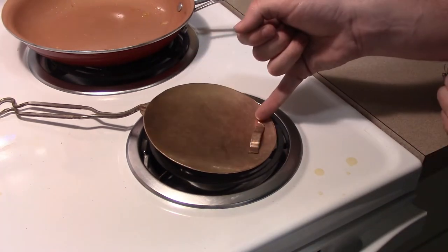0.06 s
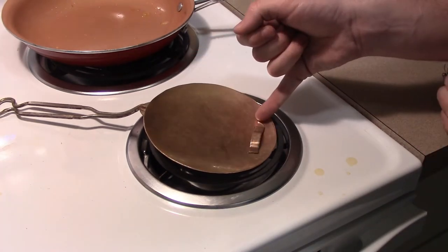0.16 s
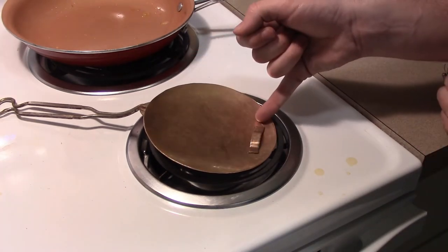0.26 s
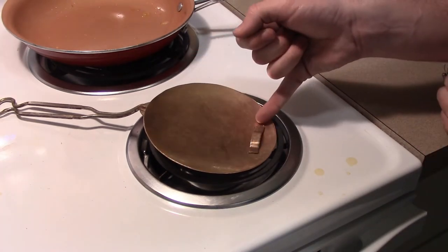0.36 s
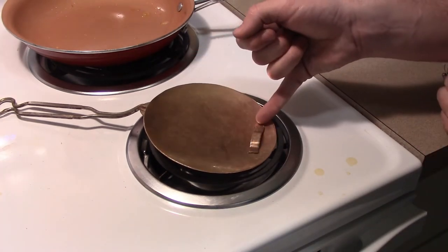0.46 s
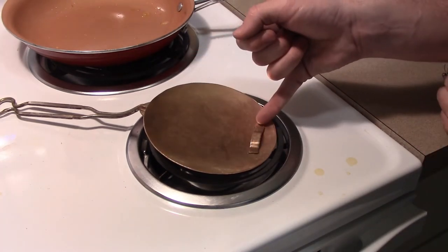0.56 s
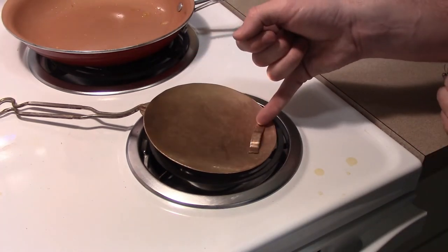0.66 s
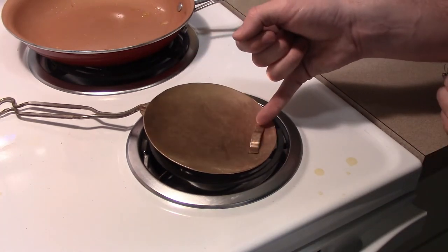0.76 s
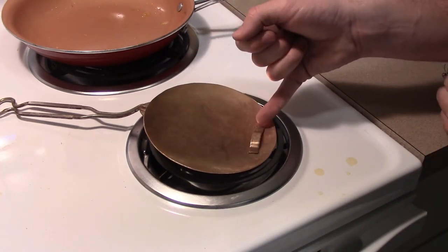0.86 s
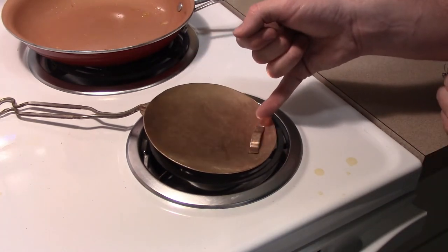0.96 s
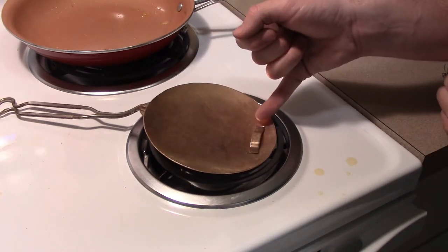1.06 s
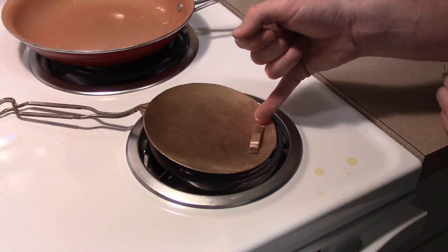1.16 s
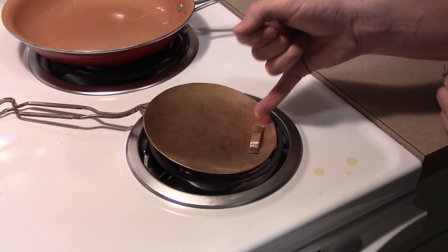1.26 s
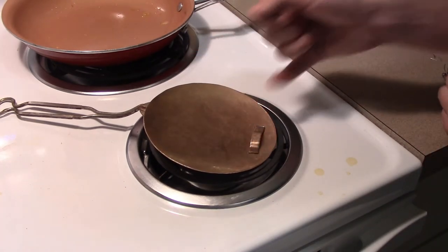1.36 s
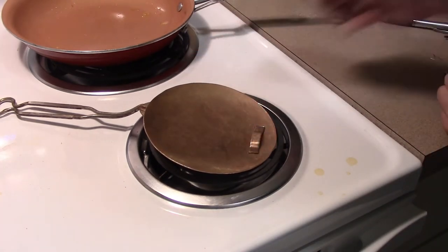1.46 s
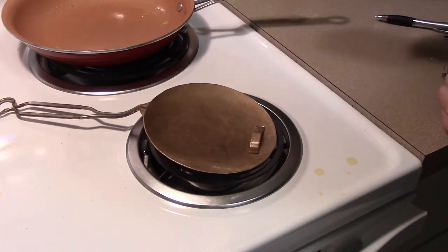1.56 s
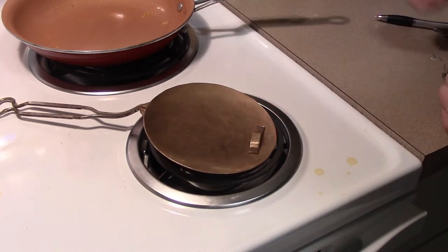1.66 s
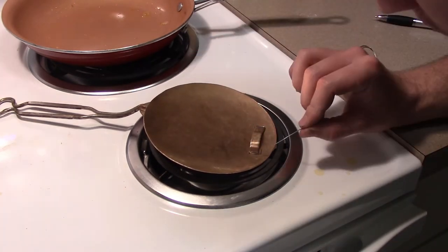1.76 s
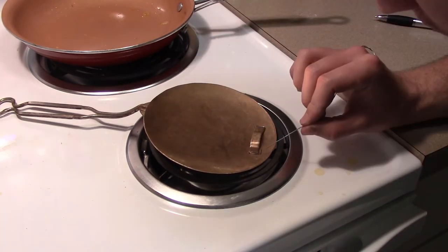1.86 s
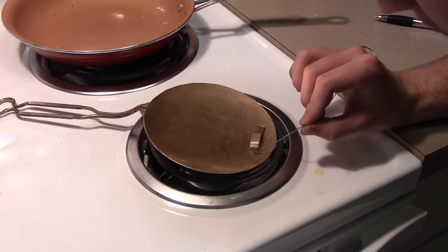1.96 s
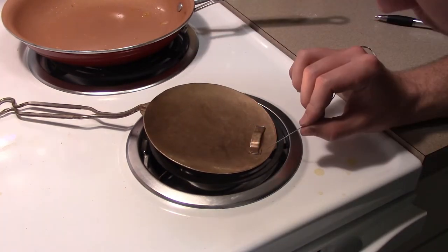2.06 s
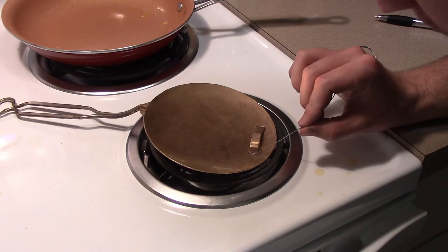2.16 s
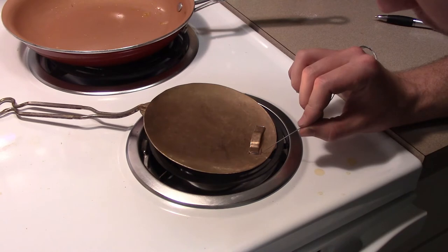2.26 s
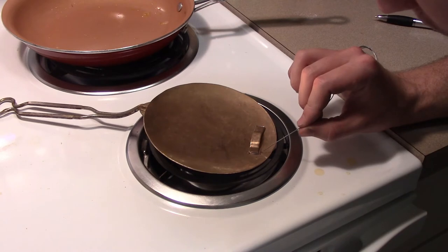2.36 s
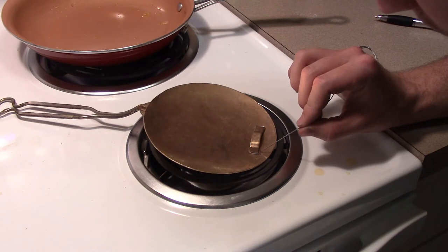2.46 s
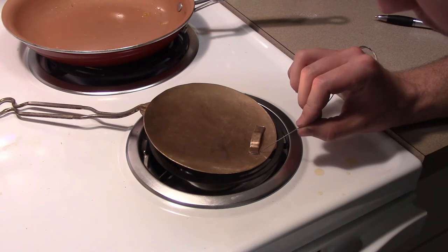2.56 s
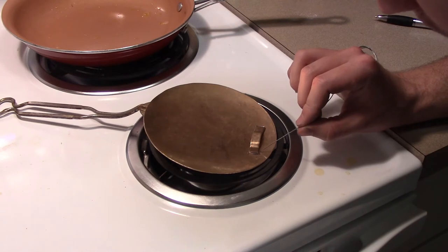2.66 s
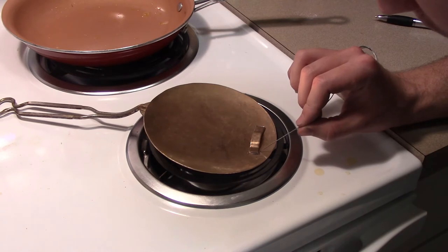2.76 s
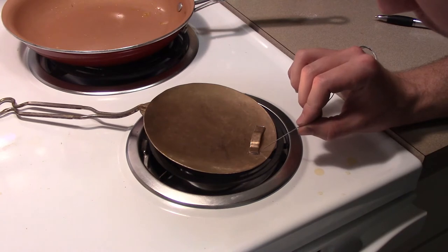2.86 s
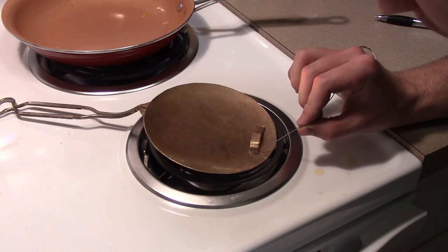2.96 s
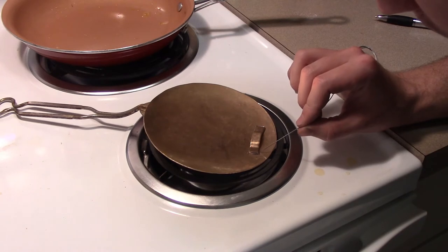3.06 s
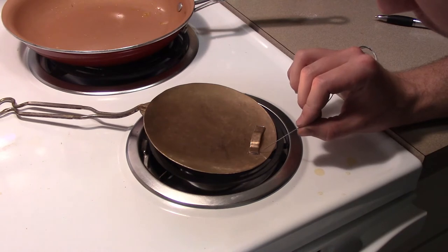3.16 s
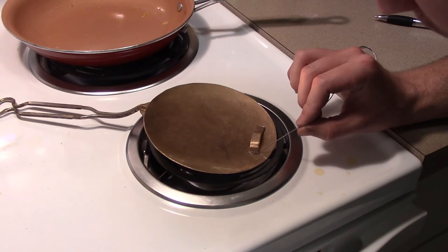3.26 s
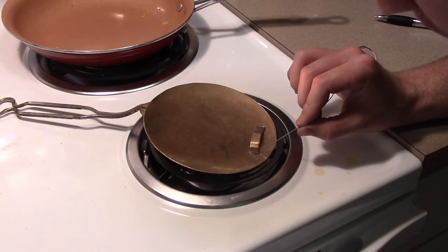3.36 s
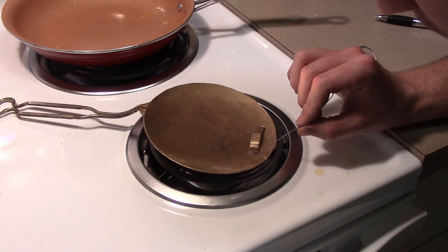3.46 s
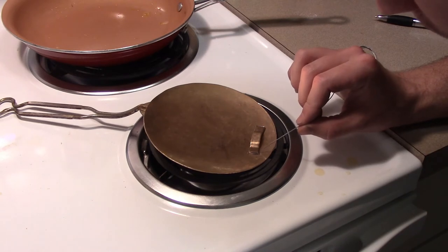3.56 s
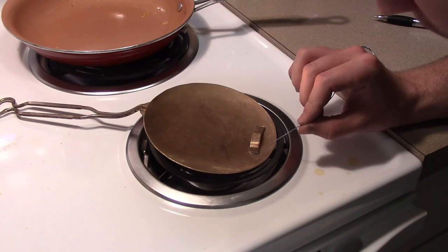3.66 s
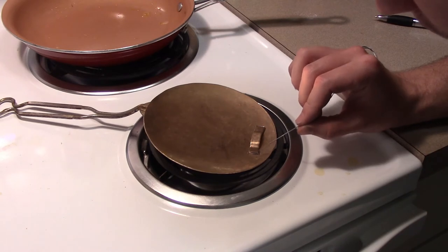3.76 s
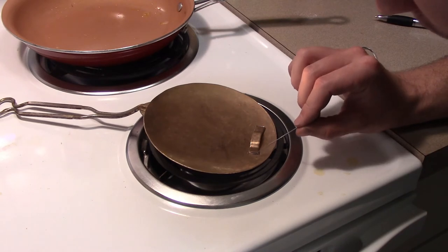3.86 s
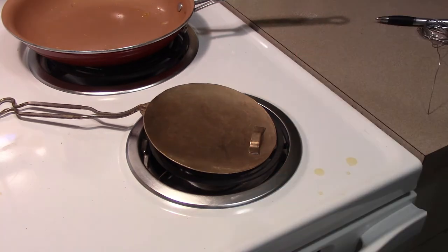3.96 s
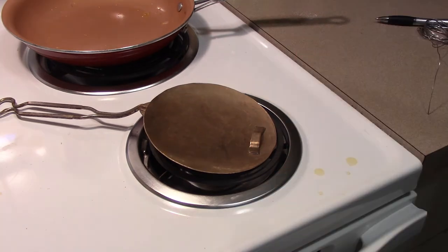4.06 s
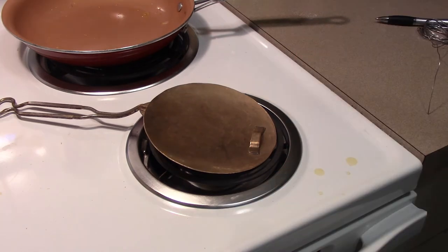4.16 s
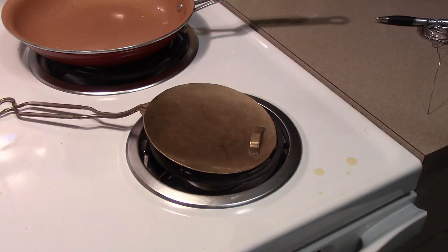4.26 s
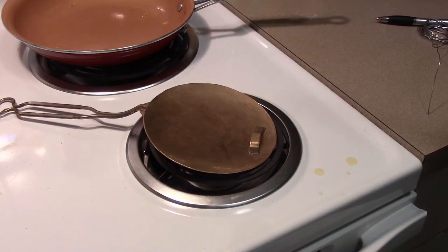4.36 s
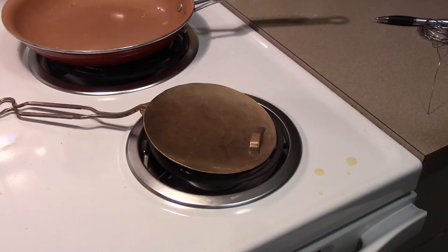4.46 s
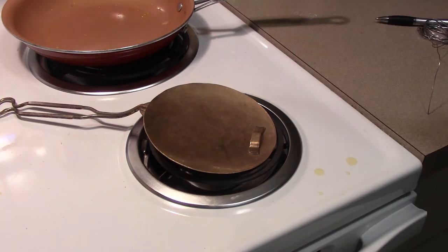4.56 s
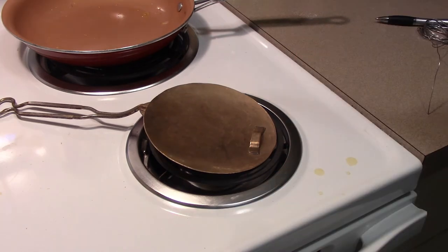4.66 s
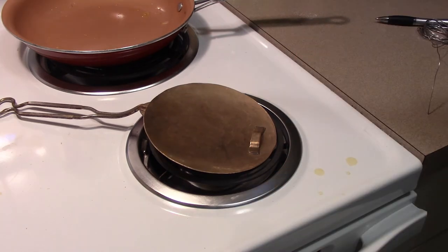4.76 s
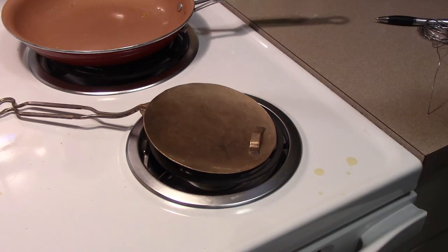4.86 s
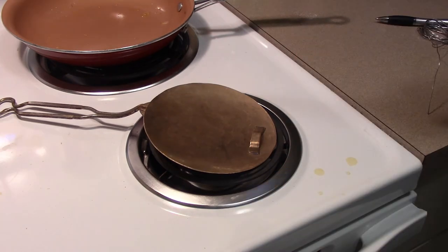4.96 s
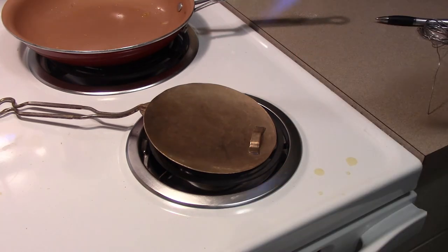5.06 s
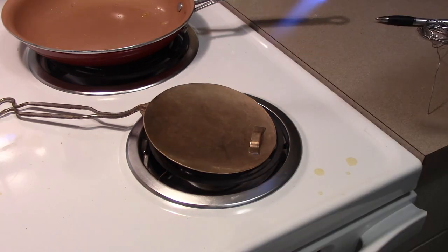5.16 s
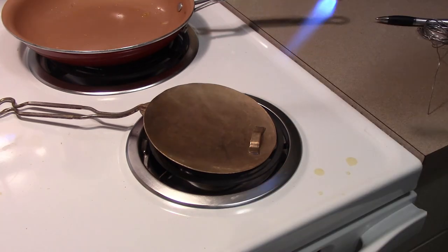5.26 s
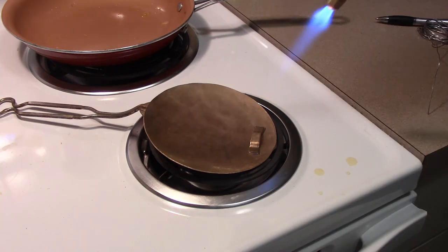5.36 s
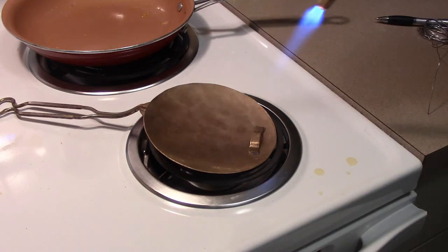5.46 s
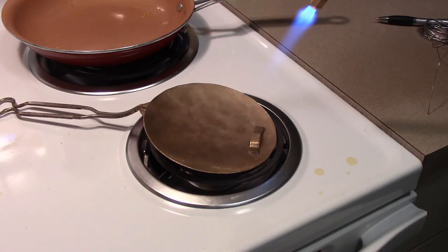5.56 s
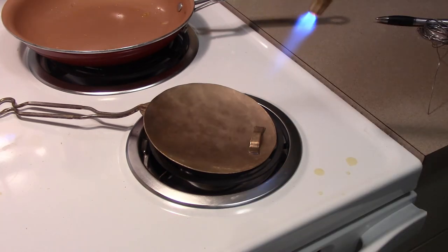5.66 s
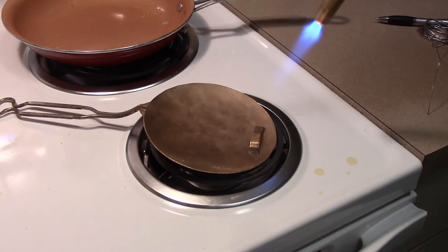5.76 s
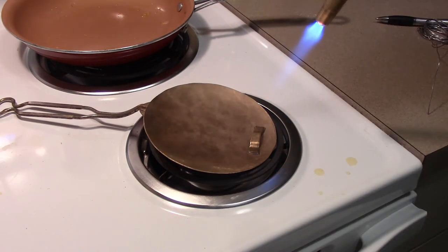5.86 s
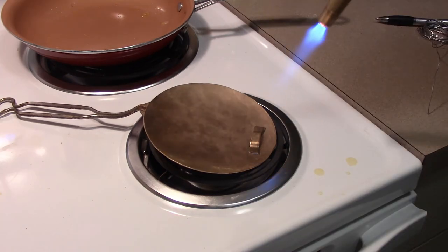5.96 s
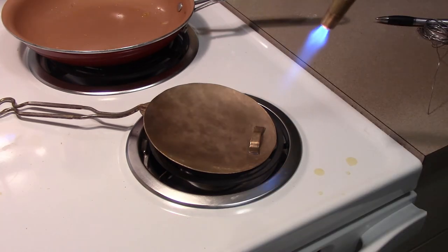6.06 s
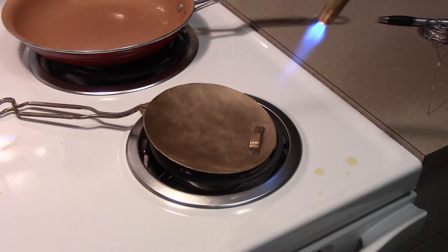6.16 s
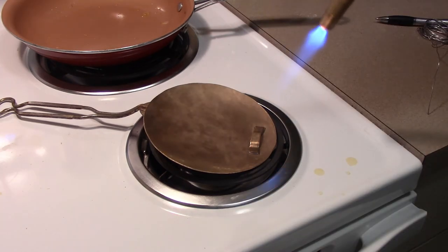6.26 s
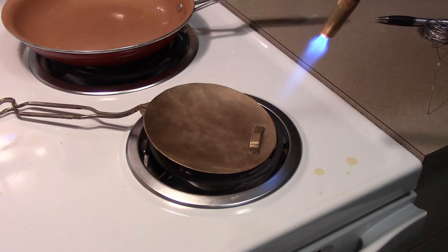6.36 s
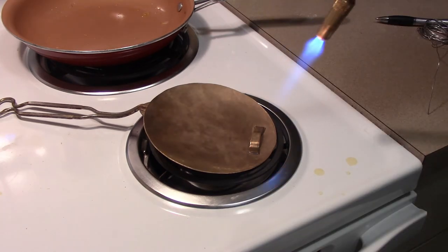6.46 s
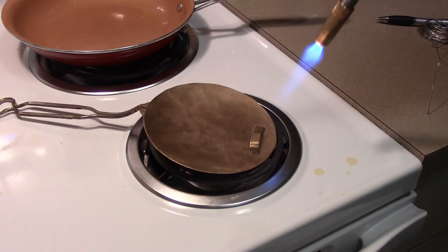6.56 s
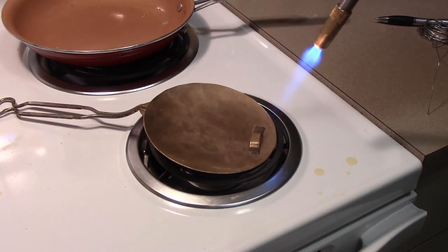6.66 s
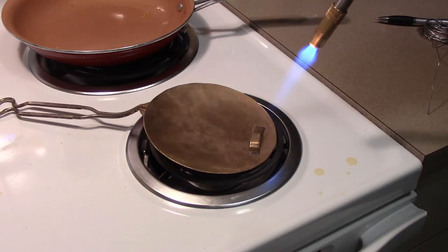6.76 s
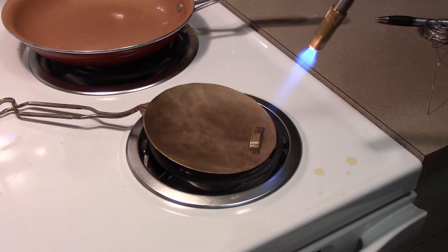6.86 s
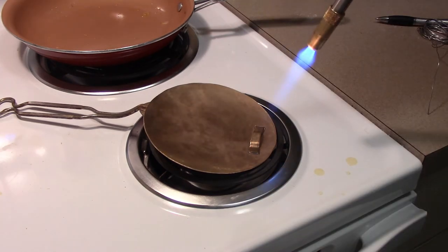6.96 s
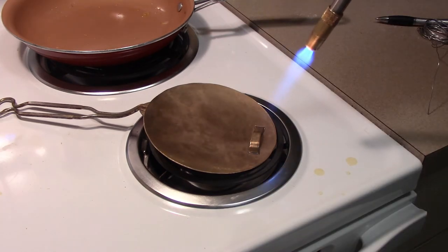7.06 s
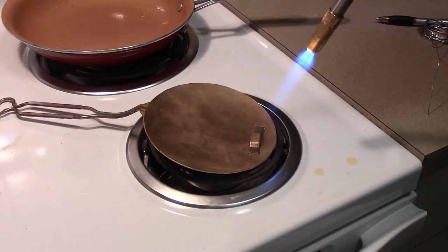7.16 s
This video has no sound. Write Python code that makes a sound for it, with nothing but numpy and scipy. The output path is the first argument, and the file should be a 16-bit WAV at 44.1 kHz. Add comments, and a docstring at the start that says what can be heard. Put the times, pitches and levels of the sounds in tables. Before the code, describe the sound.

A stove fan hums and rushes quietly indoors, with a faint airy hiss and a soft bump. A torch trigger snaps and gas hisses briefly but fails to light. A second pull snaps, catches with a low hollow puff, and a loud steady roaring hiss follows, its tone sweeping slightly as it nears a metal plate. Close microphone, small hard-surfaced kitchen, near-centred torch.

```python
"""A fan hums and rushes above a kitchen stove, under a faint airy hiss, a thin whine and soft bumps.
A gas torch is triggered twice: gas hisses through its tube and the igniter snaps but fails to light it;
on the second pull it catches with a low, hollow puff. The flame, coloured noise, then roars while it is
lowered towards a metal plate, and echoes off plate and stove top sweep its colour. Fan air is throbbing
noise under wavering tones; snaps are noise bursts in the torch body; puff and bumps are decaying modes."""
import sys
import numpy as np
from scipy import signal
from scipy.fft import rfft, irfft
from scipy.io import wavfile

SR = 44100
rng = np.random.default_rng(int(sys.argv[2]) if len(sys.argv) > 2 else 0)


def persist_wave(psi):
    """Save psi, clipped to +-1, as 16-bit WAV."""
    counts = np.round(np.clip(psi, -1, 1) * 32767).astype(np.int16)
    wavfile.write(sys.argv[1], SR, np.atleast_2d(counts).T)


N = 318402
T = np.arange(N) / SR
HZ = np.fft.rfftfreq(N, 1 / SR)
EDGE_HZ = 15850  # upper limit of the sound


def amp(db):
    """Decibels to gain."""
    return 10 ** (np.asarray(db) / 20)


def unit(x):
    """Scales to rms 1."""
    return x / np.sqrt(np.mean(x ** 2) + 1e-20)


def curve(rows, axis=1):
    """One column of a time table at every sample."""
    rows = np.asarray(rows)
    return np.interp(T, rows[:, 0], rows[:, axis])


def spectrum(points, hz=HZ):
    """Reads a frequency table on a log-frequency axis."""
    f, value = np.transpose(points)
    return np.interp(np.log(hz + 1), np.log(f), value)


def bells(rows):
    """Resonances and dips as a response in dB."""
    return sum(db * 2 ** -((2 * (HZ - hz) / width) ** 2) for hz, width, db in rows)


def shaped(x, gain):
    """Filters without delay by a gain at each frequency."""
    return irfft(rfft(x) * gain, N)


def softened(x, corner_hz):
    """Rolls off the treble smoothly above a corner."""
    return irfft(rfft(x) / (1 + (HZ / corner_hz) ** 4), N)


def colour(x, response_db):
    """Causal (minimum-phase) filter with the given response."""
    cepstrum = irfft(np.log(amp(response_db)), N)
    # folding the cepstrum forward in time makes the filter causal
    cepstrum[1:N // 2] *= 2
    cepstrum[N // 2 + 1:] = 0
    return irfft(rfft(x) * np.exp(rfft(cepstrum)), N)


def noise(response_db):
    """Turbulence with the given spectrum, rms 1."""
    return unit(shaped(rng.standard_normal(N), amp(response_db)))


def drift(rate_hz):
    """Slow chance up to a rate, rms 1."""
    return unit(shaped(rng.standard_normal(N), np.exp(-(HZ / rate_hz) ** 2)))


def dying(s, t60):
    """An envelope that starts at s and falls 60 dB in t60 seconds."""
    return (T >= s) * np.exp(-np.log(1000) * np.maximum(T - s, 0) / t60)


def ring(s, hz, db, t60):
    """One struck mode."""
    return amp(db) * dying(s, t60) * np.sin(2 * np.pi * hz * (T - s))


# the fan's rush of air: pitch_hz [Hz], relative_db [dB per Hz]
FAN_AIR_SPECTRUM = [(25, -13), (70, -23), (95, -6.5), (140, -12.5), (180, -6), (290, -3.5), (360, -0.5),
                    (540, -8.5), (1000, -17.5), (2200, -30.5), (4000, -35.5), (8000, -38.5), (12500, -44),
                    (15500, -51)]
# the fan's steady tones: pitch_hz [Hz], level_db [rms dB], waver_hz [rms Hz]
FAN_TONE_LIST = [(115.6, -54, 0.09), (119.6, -44.5, 0.12), (176, -61, 2.2), (188.6, -54, 1.13),
                 (318.4, -50.5, 2.2), (337.5, -52.5, 1.83), (361.7, -47.5, 1.84), (389, -48.5, 1.53),
                 (406, -60, 1.44), (479, -51, 1.45), (598, -55.5, 2.14), (757, -58.5, 4.15),
                 (897, -62, 2.9), (1410, -69.5, 0.72), (1680, -68, 1.16), (2110, -74, 0.88)]
THROB = 0.22  # depth of the air's throb, as a share of its low range


def fan(air_db=-40.0, shaft_hz=24.4, swell_db=0.5, throb_below_hz=1500):
    """Air noise throbs in its low range once a turn of the wheel, over mains hum and wavering blade tones."""
    turns = np.cumsum(shaft_hz + 1.6 * drift(2.7)) / SR
    air = noise(spectrum(FAN_AIR_SPECTRUM))
    air = air + THROB * np.cos(2 * np.pi * turns) * softened(air, throb_below_hz)
    tones = 0
    for hz, db, waver_hz in FAN_TONE_LIST:
        cycles = np.cumsum(hz + waver_hz * drift(7.2)) / SR + rng.random()
        tones = tones + amp(db) * np.sqrt(2) * np.sin(2 * np.pi * cycles)
    return air * amp(air_db + swell_db * drift(3.2)) + tones


# spectrum of the airy treble: pitch_hz [Hz], relative_db [dB per Hz]
AIRY_SPECTRUM = [(3000, -20), (5000, 2), (6200, -2), (7100, 3), (8300, 1), (10000, -3.5), (13500, -16),
                 (15500, -21)]
# its swells and fades: start_s [s], level_db [dB before the trim]
AIRY_LEVEL = [(0, -61), (0.25, -63), (0.43, -58.5), (0.58, -62), (0.86, -65), (0.99, -58), (1.14, -60.5),
              (1.24, -67), (1.36, -59.5), (1.57, -61), (1.66, -66), (1.8, -62), (1.92, -71), (2.3, -66),
              (2.6, -63), (3.05, -66), (3.7, -68), (4, -74)]


def fan_hiss(trim_db=-0.5, patchy_db=1.0, patch_hz=6.0, count=10):
    """A faint airy hiss that swells and fades, each band flickering on its own."""
    air = rfft(noise(spectrum(AIRY_SPECTRUM)))
    band = HZ / EDGE_HZ * count
    patches = 0
    for k in range(2, count + 1):
        # neighbouring triangular bands overlap and sum evenly
        patch = irfft(air * np.maximum(1 - abs(band - k), 0), N)
        patches = patches + patch * amp(patchy_db * drift(patch_hz))
    return unit(patches) * amp(trim_db + curve(AIRY_LEVEL))


# level of the thin whine: start_s [s], level_db [rms dB]
WHINE_LEVEL = [(1.6, -76), (1.75, -70.5), (3.75, -70.5), (3.95, -78)]


def whine(hz=4328, waver_hz=9.5):
    """A thin sine whose pitch is slightly unsteady."""
    cycles = np.cumsum(hz + waver_hz * drift(40)) / SR
    return amp(curve(WHINE_LEVEL)) * np.sqrt(2) * np.sin(2 * np.pi * cycles)


# soft bumps on the stove: start_s [s], level_db [peak dB before decay], pitch_hz [Hz]
STOVE_BUMPS = [(1.675, -33, 78), (3.945, -31, 82), (4.409, -32, 385)]


def bumps(t60=0.055):
    """Dull knocks, each one short low mode."""
    return sum(ring(s, hz, db, t60) for s, db, hz in STOVE_BUMPS)


# the snap's spectrum before its tilt: pitch_hz [Hz], relative_db [dB per Hz]
SNAP_SPECTRUM = [(300, -38), (700, -8), (1100, 1.5), (3000, 4), (4300, 4.5), (6000, 7.5), (9500, 7),
                 (12000, -0.5), (14500, -5), (16000, -16)]
# modes of the torch body: pitch_hz [Hz], width_hz [Hz], gain_db [dB]
BODY_MODES = [(1110, 580, 6), (1500, 240, 6.5), (2684, 240, 11.5), (3510, 330, 8), (8300, 400, -1),
              (9700, 300, 0)]


def snap(s, db, t60, tilt_db, contact=1.6):
    """The trigger or the sprung hammer strikes hard, then rattles in the torch body."""
    rattle = rng.standard_normal(N) * dying(s, t60)
    rattle[round(s * SR)] += contact
    body_db = spectrum(SNAP_SPECTRUM) + bells(BODY_MODES) + tilt_db * np.log2(HZ + 1)
    body_db = body_db - 10 * np.log10(np.mean(amp(body_db) ** 2))  # tone only, no change of level
    return amp(db) * colour(rattle, body_db)


# trigger and igniter: start_s [s], level_db [dB], decay_s [s to fall 60 dB], tilt_db [dB per octave]
TORCH_CLICKS = [(3.947, -37.5, 0.002, -3), (4.1176, -9, 0.048, 0.1), (4.121, -16, 0.1, 1),
                (4.2394, -20, 0.016, -2.5), (4.244, -23.5, 0.033, -2.5), (4.412, -44, 0.03, -7),
                (4.6837, -8.5, 0.039, 0.5)]


def igniter():
    """All the clicks of the torch's mechanism, each a strike and its rattle."""
    return sum(snap(*row) for row in TORCH_CLICKS)


# the valve opens quickly, and the pressure sags from then on
VALVE_OPEN_S, SAG_DB_PER_S = 0.017, 29


def flow(opens, ends, db, t60):
    """One pull of the trigger: a quick rise, a sagging hold and a tail that dies faster than the sag."""
    since_open = np.maximum(T - opens, 0)
    emptying = np.exp(-np.log(1000) * np.maximum(T - ends, 0) / t60)
    return np.minimum(since_open / VALVE_OPEN_S, 1) * amp(db - SAG_DB_PER_S * since_open) * emptying


# the unlit jet: pitch_hz [Hz], relative_db [dB per Hz]
JET_SPECTRUM = [(400, -22), (1000, 7.5), (1700, -7.5), (2900, -2), (4100, -3.5), (5800, 8.5), (7500, 4),
                (11000, 3), (13500, -1), (15500, -18)]
# resonances of the burner tube: pitch_hz [Hz], width_hz [Hz], gain_db [dB]
TUBE_RESONANCES = [(1040, 200, 1.5), (2230, 310, 12), (3440, 190, 14.5), (4800, 300, 7), (5680, 380, 8)]
# pulls of the trigger: open_s [s], flow_end_s [s], level_db [dB before the sag]
TRIGGER_PULLS = [(4.081, 4.263, -29), (4.578, 4.69, -29.5)]
# the tube empties once the flow ends: 60 dB fall times, on top of the sag
EMPTY_T60_S, EMPTY_TREBLE_T60_S = 0.31, 0.12


def gas(spent_hz=7500):
    """Unlit gas hisses through the burner tube while the trigger is held, and dulls as the tube empties."""
    jet = noise(spectrum(JET_SPECTRUM) + bells(TUBE_RESONANCES))
    dull = softened(jet, spent_hz)
    bright = jet - dull
    return sum(flow(*pull, EMPTY_T60_S) * dull + flow(*pull, EMPTY_TREBLE_T60_S) * bright
               for pull in TRIGGER_PULLS)


LIT_S = 4.6872  # the gas catches
# the puff of ignition: pitch_hz [Hz], level_db [peak dB before decay], decay_s [s to fall 60 dB]
PUFF_MODES = [(268, -15.5, 0.18), (390, -17, 0.08), (310, -1.5, 0.027), (125, -27, 0.13)]


def puff():
    """The gas that has gathered at the nozzle burns at once: a low, hollow pop."""
    return sum(ring(LIT_S, hz, db, t60) for hz, db, t60 in PUFF_MODES)


START_HEIGHT_CM = 12  # the nozzle's height over the plate when it is lit
# moves of the hand that bring the torch down: start_s [s], length_s [s], drop_cm [cm]
HAND_LOWERINGS = [(4.8, 0.56, 5.15), (6.1, 0.5, 1.7)]


def descent():
    """How far the torch has come down, in cm: each move starts and ends gently."""
    return sum(cm * np.sin(np.pi / 2 * np.clip((T - s) / length, 0, 1)) ** 2
               for s, length, cm in HAND_LOWERINGS)


def delayed(x, ms):
    """An echo whose delay may move."""
    return np.interp(T - ms / 1000, T, x)


SOUND_CM_PER_S = 34300
# most that bounces off the plate and off the stove top, as shares of the flame's sound
PLATE_ECHO, STOVE_ECHO = 0.28, 0.2
# share of that bounce while the flame is still beside the plate, and the descent that brings it over
BOUNCE_ASIDE, OVER_PLATE_CM = 0.4, 4.5


def bounced(x, further_ms=0.28, blur_hz=5500):
    """Echoes off the plate and the stove top grow and shorten as the torch comes down, sweeping its colour."""
    # the flame is long, so its highest treble does not mirror cleanly
    over_plate = np.interp(descent(), [0, OVER_PLATE_CM], [BOUNCE_ASIDE, 1])
    mirrored = softened(x, blur_hz) * over_plate
    ms = 1000 * 2 * (START_HEIGHT_CM - descent()) / SOUND_CM_PER_S  # down and back
    return x + PLATE_ECHO * delayed(mirrored, ms) + STOVE_ECHO * delayed(mirrored, ms + further_ms)


# slaps off the counter, back panel and walls: delay_ms [ms], gain [ratio], slide [ms per cm of descent]
COUNTER_SLAPS = [(2.6, .12, -.014), (3.2, .07, -.022), (3.26, .08, .014), (4.42, .07, -.018),
                 (7.05, .09, .006), (7.4, .09, -.01)]
# weak echoes off the pan and burner rings: spread of their delays, gain, and fastest slide
SCATTER_MS, SCATTER_GAIN, SCATTER_MS_PER_CM = 8, 0.035, 0.03
HAND_WAVER_CM = 0.3  # rms unsteadiness of the hand


def slapped(x, count=16):
    """Hard surfaces further off ripple the treble finely; ripples slide as the torch moves and the hand wavers."""
    place = descent() + HAND_WAVER_CM * drift(3)
    scattered = [(1 + SCATTER_MS * a, SCATTER_GAIN * np.sign(b - 0.5), SCATTER_MS_PER_CM * (2 * c - 1))
                 for a, b, c in rng.random((count, 3))]
    echoes = list(COUNTER_SLAPS) + scattered
    return x + sum(gain * delayed(x, ms + slide * place) for ms, gain, slide in echoes)


# spectra of the flame's roar, its hiss and its splash on the metal: pitch_hz [Hz], relative_db [dB per Hz]
ROAR_SPECTRUM = [(25, -11), (70, -40), (110, -22), (150, -15.5), (240, -2.5), (400, 1.5), (900, 4),
                 (1300, -2.5), (1800, -6), (2600, -20.5), (4500, -55)]
HISS_SPECTRUM = [(1200, -12), (2300, 2.5), (2900, 1.5), (3800, -0.5), (4200, -4.5), (5300, -7), (6000, -4),
                 (7600, -11.5), (10000, -11), (12200, -14.5), (13400, -18.5), (14000, -25), (15700, -31)]
SPLASH_SPECTRUM = [(200, -29), (450, -9), (800, 0.5), (1200, 5), (1350, 1), (1550, -24), (3000, -45)]
# resonances and cancellations of the stove top and its corner: pitch_hz [Hz], width_hz [Hz], gain_db [dB]
STOVE_RESONANCES = [(188, 16, 6), (211, 18, -5), (269, 34, 8), (390, 22, 3), (335, 40, -2.5), (413, 14, -4),
                    (440, 22, 3), (598, 16, 4), (630, 55, -4), (702, 26, 3), (818, 18, -5), (862, 14, -4),
                    (930, 90, 3.5), (1050, 70, -7), (1210, 150, 4.5), (1338, 24, 4), (1400, 70, -5),
                    (1510, 30, 2), (1660, 65, 4), (1730, 35, -3), (1772, 20, 3), (1916, 35, -4),
                    (2000, 45, 3), (2170, 90, -3), (2345, 45, 2), (2560, 45, -2), (2830, 80, 2.5),
                    (3360, 180, -1.5), (3570, 220, 1), (3920, 170, 2), (4090, 220, -3), (4770, 180, 3),
                    (5100, 130, 2.5), (5245, 200, -3.5), (5930, 260, 2.2), (6570, 220, -2.5),
                    (6900, 220, 2.5), (7710, 220, -2), (8250, 180, 2.5), (12200, 260, 2), (13470, 240, 2.5)]
# the splash's level before echoes when the torch is lowest, and how fast it falls with height
SPLASH_DB, SPLASH_DB_PER_CM = -15.5, 2.5
ROAR_NEARING = 0.097  # the roar grows as this power of nearness to the metal


def flame(roar_db=-14.5, hiss_db=-21.0, build_s=0.029, flutter_db=0.6, sputter_db=0.4):
    """Turbulent burning roars over the jet's hiss, louder and throatier as it nears the plate."""
    age = np.maximum(T - LIT_S, 0)
    stove_db = bells(STOVE_RESONANCES)
    nearness = START_HEIGHT_CM / (START_HEIGHT_CM - descent())
    height_left = descent()[-1] - descent()
    roar = noise(spectrum(ROAR_SPECTRUM) + stove_db) * amp(roar_db + flutter_db * drift(38))
    roar = roar * nearness ** ROAR_NEARING
    splash = noise(spectrum(SPLASH_SPECTRUM) + stove_db) * amp(SPLASH_DB - SPLASH_DB_PER_CM * height_left)
    hiss = noise(spectrum(HISS_SPECTRUM) + stove_db) * amp(hiss_db + sputter_db * drift(160))
    # the hiss is there almost at once; the roar builds as the flame grows
    burning = (roar + splash) * (1 - np.exp(-age / build_s))
    return bounced(burning + slapped(hiss * (1 - np.exp(-age / 0.0014))))


# the band of the flame's rasp: pitch_hz [Hz], gain_db [dB]
RASP_BAND = [(1150, -46), (1500, -1), (2800, -16), (3500, -15)]
RASP_DB_PER_CM = -0.24  # the rasp turns away from the microphone


def aimed(x, facing_db=2.0):
    """The nozzle beams its mid-range rasp, which fades as the torch turns down."""
    rasp = shaped(x, amp(spectrum(RASP_BAND)))
    return x + (amp(facing_db + RASP_DB_PER_CM * descent()) - 1) * rasp


# the kitchen's reverberation: pitch_hz [Hz], decay_s [s to fall 60 dB]
ROOM_DECAY = [(150, 0.17), (1000, 0.39), (5000, 0.33), (10000, 0.22), (16000, 0.029)]


def kitchen(x):
    """A dense tail of reflections: noise decaying band by band, the highest treble dying first."""
    hz, t, z = signal.stft(rng.standard_normal(SR // 2), SR, nperseg=256)
    z = z * np.exp(-np.log(1000) * t / spectrum(ROOM_DECAY, hz)[:, None])
    tail = signal.istft(z, SR)[1]
    tail *= 1 - np.exp(-T[:len(tail)] / 0.0044)  # reflections gather over a few ms
    return signal.fftconvolve(x, tail / np.linalg.norm(tail))[:N]


def moving_kitchen(x):
    """The pattern of reflections changes from the torch's first place to its last."""
    angle = np.pi / 2 * descent() / descent()[-1]
    return kitchen(x * np.cos(angle)) + kitchen(x * np.sin(angle))


def widen(x, width):
    """Two close microphones share the direct sound and differ only in scattered reflections."""
    scatter = rng.standard_normal(SR // 20) * np.exp(-T[:SR // 20] / 0.0034)
    scattered = signal.fftconvolve(x, scatter / np.linalg.norm(scatter))[:N]
    side = colour(scattered, spectrum(width))
    return np.array([x + side, x - side])


# stereo width of the near torch and of the diffuse fan: pitch_hz [Hz], side_db [dB]
TORCH_WIDTH = [(90, -35), (160, -98), (300, -29), (740, -41), (1220, -24), (3300, -23), (5500, -17),
               (11000, -21.5), (15000, -61)]
DIFFUSE_WIDTH = [(60, -16), (110, -31), (200, -24), (380, -24.5), (1290, -15), (2400, -9.5), (9000, -13.5),
                 (15000, -10)]


def scene():
    """The near torch with its reverberation, and the fan that fills the kitchen."""
    trigger, fire, pop = gas() + igniter(), aimed(flame()), puff()
    wet = moving_kitchen(amp(-9.0) * trigger + amp(-9.5) * fire + amp(-2.5) * pop)
    torch = widen(trigger + fire + pop + wet, TORCH_WIDTH)
    background = widen(fan() + fan_hiss() + whine() + bumps(), DIFFUSE_WIDTH)
    return torch + background


def record(dry, low_cut_hz=106):
    """The microphone sheds deep bass, peaks are rounded off near full scale; then the band limit."""
    low_cut = signal.butter(3, low_cut_hz, "highpass", fs=SR, output="sos")
    lean = signal.sosfilt(low_cut, dry)
    rounded = lean / (1 + lean ** 8) ** (1 / 8)
    band_limit = signal.firwin(511, EDGE_HZ, window=("kaiser", 9), fs=SR)
    return signal.oaconvolve(rounded, band_limit[None], "same")


dry = scene()
out = record(dry)
persist_wave(out)
```